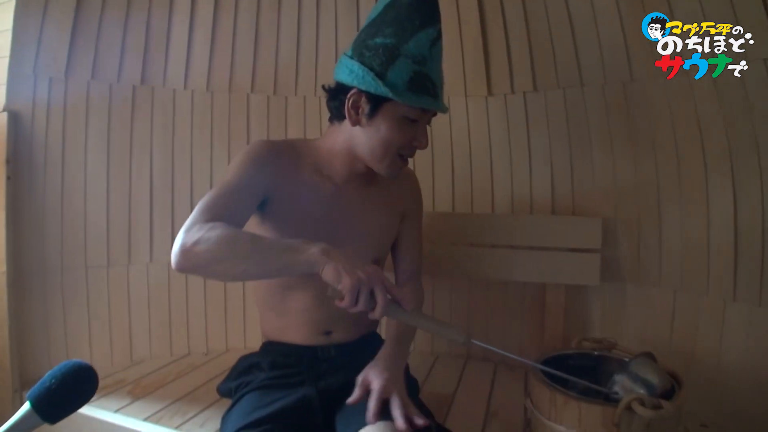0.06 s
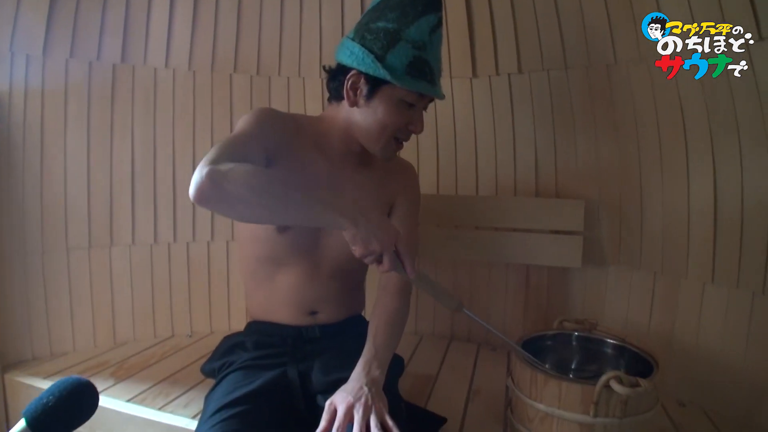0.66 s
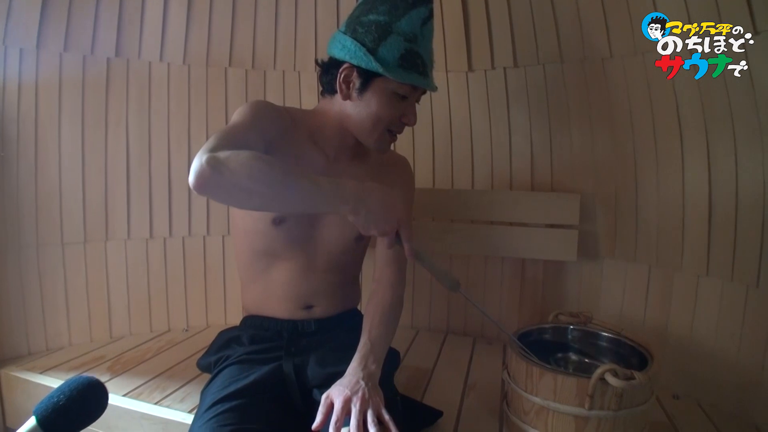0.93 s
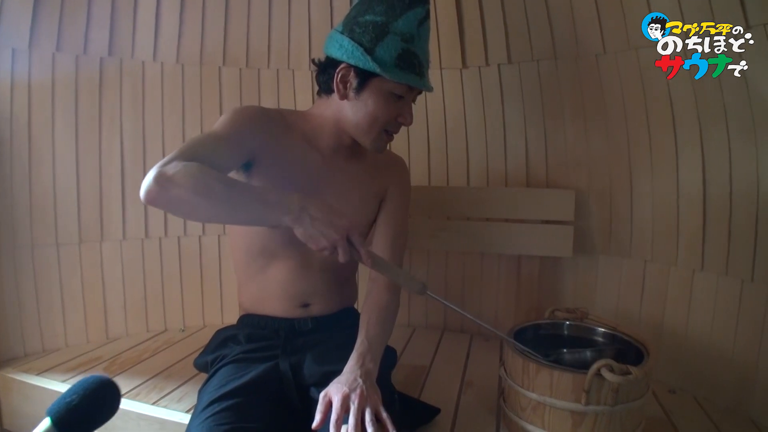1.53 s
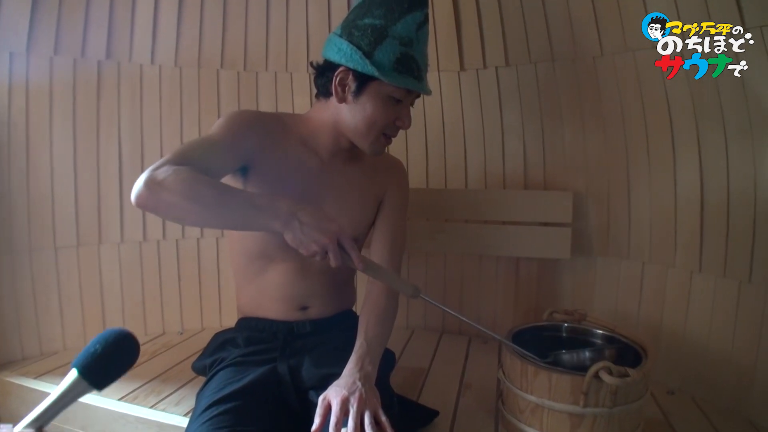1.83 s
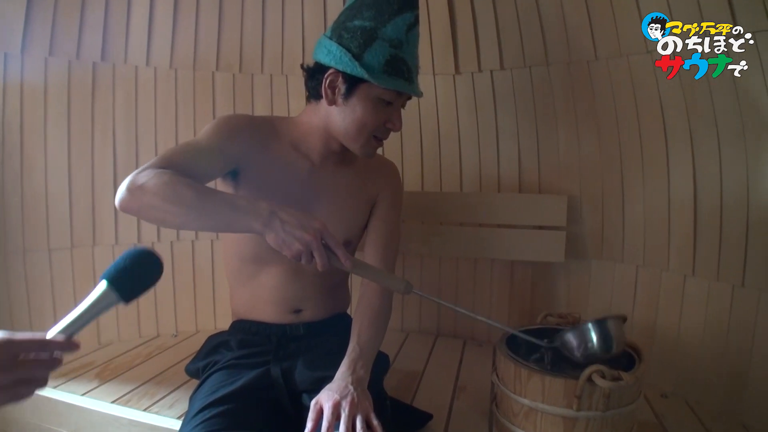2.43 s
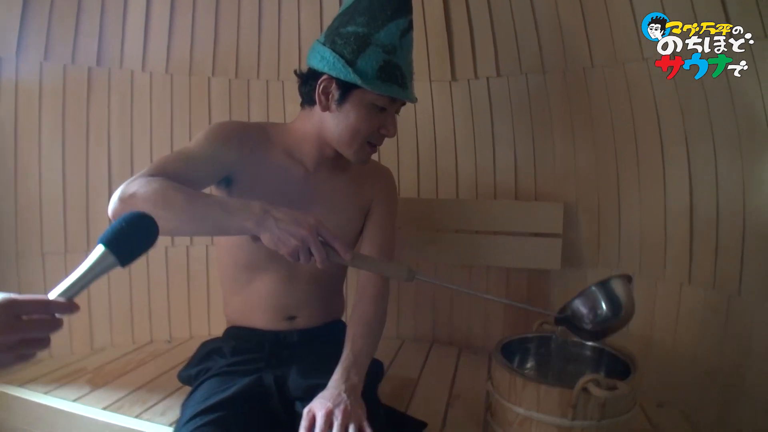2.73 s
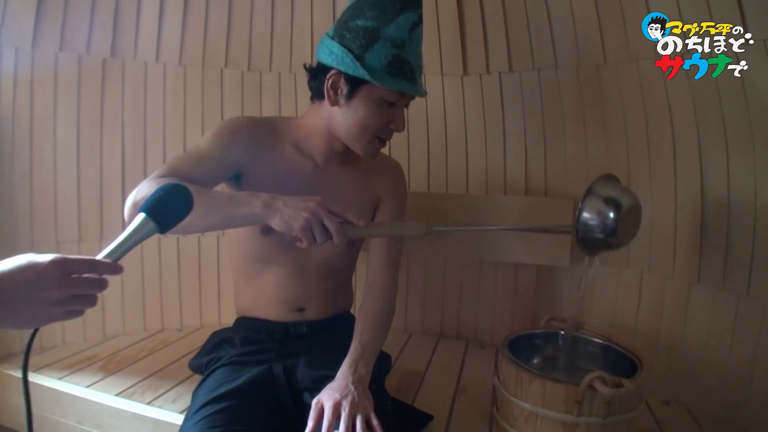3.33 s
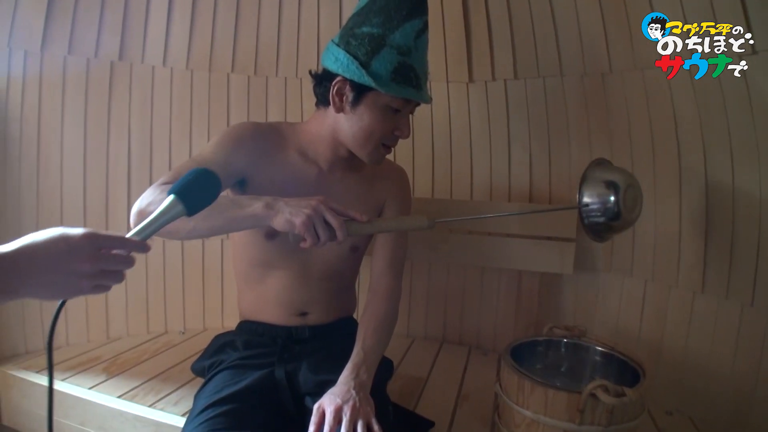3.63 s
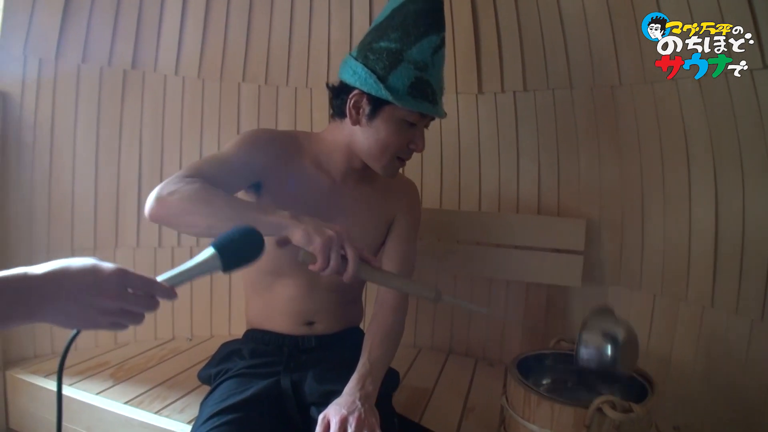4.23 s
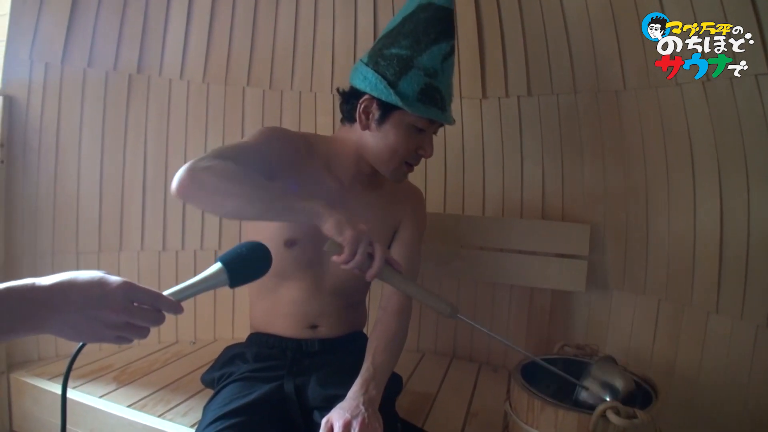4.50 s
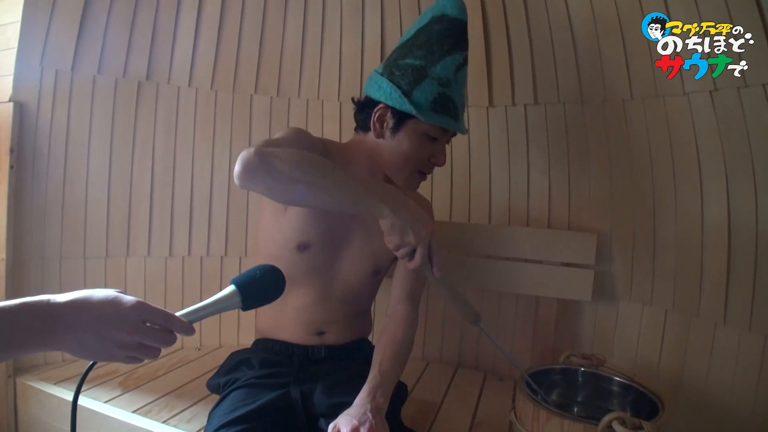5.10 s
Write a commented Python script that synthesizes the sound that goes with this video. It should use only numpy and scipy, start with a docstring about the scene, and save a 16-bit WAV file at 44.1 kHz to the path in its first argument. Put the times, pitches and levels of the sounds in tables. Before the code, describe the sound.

In a small wooden room, a metal ladle strikes a bucket, slides down its lining, bubbles full and spills water back in.

```python
"""A small wood-panelled sauna, one microphone near a metal-lined wooden bucket, over faint hiss and hum.
A long-handled steel ladle clanks on the rim, slides and squeals down the lining, gulps air bubbles
as it fills, and bumps the side on its way up. The microphone is raised and the water sounds closer.
Run-off from the lifted bowl patters back into the bucket, swells to a short splash and ends in drips."""
import sys
import numpy as np
from scipy import signal
from scipy.fft import rfft, irfft, next_fast_len
from scipy.io import wavfile
from scipy.ndimage import uniform_filter1d

SR = 44100
rng = np.random.default_rng(int(sys.argv[2]) if len(sys.argv) > 2 else 0)


def generate_wav(signal):
    """Clip the signal to [-1, 1] and save it as 16-bit WAV at the path in sys.argv[1]."""
    frames = np.transpose(np.atleast_2d(signal))
    scaled = np.clip(frames, -1, 1) * 32767
    pcm = np.round(scaled).astype(np.int16)
    wavfile.write(sys.argv[1], SR, pcm)


N = 227571
TIME = np.arange(N) / SR
TAIL = TIME[:SR * 3 // 4]  # time axis of one decaying sound

# water running off the bowl as it tips, then draining away: time_s, flow_db
RUN_OFF = [(2.62, -81), (2.72, -69), (2.86, -69), (2.96, -62), (3.2, -60), (3.38, -57.5), (3.48, -50.5),
           (3.87, -52), (3.94, -70), (4.45, -79)]


def amp(db):
    """Decibels to gain."""
    return 10 ** (np.asarray(db) / 20)


def unit(x):
    """Scales to rms 1."""
    return x / np.sqrt(np.mean(x ** 2) + 1e-30)


def crest(x):
    """Scales so that the loudest 10 ms have rms 1."""
    return x / np.sqrt(uniform_filter1d(x ** 2, SR // 100).max() + 1e-30)


def read(points, hz):
    """A table joined by straight lines over log frequency."""
    f, value = np.transpose(points)
    return np.interp(np.log(hz + 1), np.log(f + 1), value)


def curve(points):
    """A table joined by straight lines over time, at every sample."""
    return np.interp(TIME, *np.transpose(points))


def add(mix, start_s, sound):
    """Mixes a sound in at a time."""
    part = mix[max(round(start_s * SR), 0):][:len(sound)]
    part += sound[:len(part)]


def colour(x, gain):
    """Filters by a gain given as a function of Hz."""
    size = next_fast_len(len(x))
    return irfft(rfft(x, size) * gain(np.fft.rfftfreq(size, 1 / SR)), size)[:len(x)]


def equalise(x, spectrum):
    """Filters by a table of freq_hz, gain_db."""
    return colour(x, lambda hz: amp(read(spectrum, hz)))


def die_away(x, t60s):
    """Lets each band fade at its own rate."""
    hz, t, bands = signal.stft(x, SR, nperseg=256)
    fade = amp(-60 * t / read(t60s, hz)[:, None])
    return signal.istft(bands * fade, SR, nperseg=256)[1][:len(x)]


def wander(rate_hz):
    """A random drift of rms 1."""
    knots = rng.standard_normal(int(N / SR * rate_hz) + 2)
    return unit(np.interp(TIME * rate_hz, np.arange(len(knots)), knots))


def swell(peak_s, db, sigma_s):
    """A bell-shaped rise and fall around one moment."""
    return amp(db) * np.exp(-.5 * ((TIME - peak_s) / sigma_s) ** 2)


def chance(per_s, length=N):
    """Marks random samples at a mean rate."""
    return rng.random(length) < per_s / SR


def drop_sizes(spread_db):
    """A random gain for every sample: mostly small, a few large."""
    return amp(spread_db * np.minimum(rng.exponential(1, N), 3))


def singing(hz, width_hz):
    """A resonance kept ringing by irregular pushes: fairly even in level, restless in phase."""
    x = colour(rng.standard_normal(N), lambda f: 1 / (1 + (2 * (f - hz) / width_hz) ** 2))
    return x / np.sqrt(uniform_filter1d(x ** 2, size=2200) + 1e-20)


def cabin(x, wet_db, first_echo_s=.003):
    """Direct sound plus dense echoes off the close wooden walls, drawn afresh for each sound."""
    # decay of the room: freq_hz, t60_s
    room_decay = [(200, 0.37), (1000, 0.13), (3000, 0.17), (8000, 0.1), (15000, 0.18)]
    taps = rng.standard_normal(len(TAIL)) * chance(4000, len(TAIL)) * (TAIL > first_echo_s)
    echoes = die_away(taps, room_decay)
    response = amp(wet_db) * echoes / np.linalg.norm(echoes)
    response[0] += 1
    return signal.fftconvolve(x, response)[:len(x)]


def room_tone(hiss_db=-66.5, settled_db=-71, fall_db=7.5, settle_s=1.84):
    """Steady faint hiss, and a wavering hum where the cabin resonates that starts louder and settles."""
    # colour of the hiss: freq_hz, gain_db
    hiss_spectrum = [(15, -43.5), (25, -16.5), (98, -10.5), (167, -11), (219, -8.5), (271, -20), (301, -8),
                     (529, -12.5), (621, -11.5), (1420, -17.5), (1720, -20.5), (2300, -25.5), (3010, -27),
                     (3730, -25), (15000, -28.5)]
    hiss = unit(equalise(rng.standard_normal(N), hiss_spectrum))
    hum_db = settled_db + fall_db * np.exp(-TIME / settle_s) + 2.5 * wander(7.3)
    return amp(hiss_db) * hiss + amp(hum_db) * singing(hz=228, width_hz=65)


def ring(modes, t60_scale=1.0, gain=np.ones_like):
    """Decaying partials, each as strong as the blow is at its frequency."""
    hz, db, t60 = np.transpose(modes)[:, :, None]
    phase = rng.random(hz.shape)
    decay = np.exp(-np.log(1000) * TAIL / (t60 * t60_scale))
    return (gain(hz) * amp(db) * decay * np.sin(2 * np.pi * (hz * TAIL + phase))).sum(0)


def knocks(build_s=0.01, clatter_db=-5.5, clatter_t60_scale=0.9):
    """Each blow rings steel and staves, building while the bowl chatters and the first echoes arrive."""
    # ladle against bucket: start_s, level_db, corner_hz (low = soft blow), steel_db, wood_db
    blows = [(0.066, -56.5, 6960, -1, -3), (0.446, -20, 13800, 2.5, -27), (0.4551, -25, 6200, -10, -25),
             (0.6661, -44, 1670, -12, -8), (0.854, -59, 6000, -11, -8), (1.006, -45, 3700, -0.5, -26),
             (1.915, -54, 2400, 1, -13), (2.273, -48.5, 945, -10, 11.5), (2.679, -61, 2480, -13, -3.5),
             (4.033, -57.5, 3040, -10, -13), (4.607, -66, 3520, -8, -15.5), (4.983, -65.5, 2970, 0, -2.5)]
    # steel bowl and lining: pitch_hz, level_db, base_t60_s
    steel_modes = [(828, -19, .22), (877, -20, .22), (922, -29, .5), (1345, -13, .19), (1540, -18, .28),
                   (1728, -15, .15), (2216, -12, .16), (2462, -33, .4), (2493, -18, .2), (2619, -13, .16),
                   (2697, -13, .15), (2923, -15, .13), (3036, -13, .17), (3122, -29, .6), (3223, -2, .11),
                   (3326, -12, .12), (3464, -12, .15), (3509, -8, .13), (3543, -8, .14), (3710, -12, .15),
                   (3936, -13, .13), (3986, -13, .13), (4472, -8, .12), (4625, -6, .12), (4846, -9, .12),
                   (5068, -29, .36), (5547, -14, .11), (5660, -12, .1), (5994, -18, .14), (7609, -23, .1)]
    # staves and water-loaded bottom: pitch_hz, level_db, base_t60_s
    stave_modes = [(196.4, -17, 0.36), (242.6, -16.5, 0.16), (320.8, -3.5, 0.32), (400, -9.5, 0.18),
                   (640.5, -5.5, 0.21), (1075, -7, 0.36), (1177, -1, 0.13), (1448, -9.5, 0.17),
                   (1617, -14.5, 0.38)]
    # the dense weaker modes: freq_hz, gain_db
    clatter_spectrum = [(35, -68.5), (100, -37.5), (220, -16.5), (310, -25.5), (430, -16), (650, -24),
                        (850, -15), (1400, -14.5), (2200, -8), (3250, -8), (4500, -8), (6500, -10.5),
                        (9500, -14.5), (16000, -35.5)]
    # their decay: freq_hz, base_t60_s
    clatter_decay = [(150, 0.78), (400, 0.29), (1000, 0.37), (2800, 0.2), (5000, 0.15), (8000, 0.11),
                     (14000, 0.113)]
    out = np.zeros(N)
    build = np.minimum(0.3 + TAIL / build_s, 1) * np.minimum(TAIL / .0005, 1)
    for start_s, db, corner_hz, steel_db, wood_db in blows:
        contact = lambda hz: 1 / np.sqrt(1 + (hz / corner_hz) ** 4)  # a soft blow leaves out the treble
        noise = rng.standard_normal(len(TAIL))
        dense = unit(colour(noise, lambda hz: amp(read(clatter_spectrum, hz)) * contact(hz)))
        clatter = die_away(dense, [(hz, t60 * clatter_t60_scale) for hz, t60 in clatter_decay])
        steel = amp(steel_db + 0.5) * ring(steel_modes, t60_scale=1.27, gain=contact)
        wood = amp(wood_db) * ring(stave_modes, t60_scale=0.8)
        add(out, start_s, amp(db) * build * (2 * amp(clatter_db) * clatter + steel + wood))
    return out


def wetness(time_s, deep_db=2.5, raised_db=-1):
    """Sounds deep in the bucket arrive mostly as echo; more comes direct once the microphone is raised."""
    return np.interp(time_s, [2.3, 3.1], [deep_db, raised_db])


def bubble(hz, t60, rise_octaves=0.18):
    """A pocket of air rings and climbs in pitch, by rise_octaves per t60, as it nears the surface."""
    t = TAIL[:SR // 3]
    pitch = hz * 2 ** (rise_octaves * np.minimum(t / t60, 2))
    envelope = np.exp(-np.log(1000) * t / t60) * (1 - np.exp(-t * hz))
    return np.sin(2 * np.pi * np.cumsum(pitch) / SR) * envelope


def plinks(satellites=4, satellite_db=-9, scatter_octaves=0.365, max_delay_s=.014):
    """Large bubbles ring, each tearing off a few satellites; small ones ring higher and die sooner."""
    # the loudest single bubbles: start_s, pitch_hz, level_db
    bubbles = [(0.066, 3200, -58), (0.667, 408, -50.5), (0.957, 1057, -55.5), (0.984, 500, -53),
               (1.009, 577, -53), (1.038, 1180, -48.5), (1.467, 2310, -50.5), (1.469, 4000, -46.5),
               (1.492, 2460, -50.5), (1.631, 2430, -52.5), (1.635, 2900, -53), (1.665, 2750, -52.5),
               (1.757, 1740, -57), (1.759, 2360, -56), (2.221, 3410, -58), (2.36, 2840, -64.5),
               (2.417, 3090, -51.5), (3.115, 730, -59), (3.133, 2690, -56.5), (3.268, 5060, -47),
               (3.268, 1157, -56), (3.418, 390.6, -44), (3.471, 3230, -48), (3.607, 3180, -49),
               (3.637, 2720, -39.5), (3.661, 3340, -48), (3.76, 2900, -47.5), (3.775, 2780, -40.5),
               (3.806, 592, -48.5), (3.81, 3530, -37), (3.833, 2684, -37.5), (3.837, 1930, -44),
               (3.849, 562, -49.5), (3.912, 759, -52.5), (3.969, 6500, -56.5), (4.364, 5360, -57),
               (4.916, 2900, -59.5)]
    out = np.zeros(N)
    t60 = lambda hz: 50 * (1000 / hz) ** 0.31 / hz  # 50 cycles at 1 kHz, fewer above
    for start_s, hz, db in bubbles:
        cluster = bubble(hz, t60(hz))
        for height, delay in rng.random((satellites, 2)):
            satellite_hz = hz * 2 ** (scatter_octaves * (3 * height - 1))
            satellite = bubble(satellite_hz, t60(satellite_hz) / 2)
            add(cluster, max_delay_s * delay, amp(satellite_db) * satellite)
        add(out, start_s, amp(db) * crest(cabin(cluster, wetness(start_s))))
    return out


def slaps():
    """A drop hits the surface with a sharp tick and a very short burst of hiss."""
    # the loudest drops: start_s, level_db, centre_hz
    drops = [(0.065, -60, 9300), (0.667, -54, 7100), (1.01, -61, 9900), (1.468, -49, 5340),
             (1.494, -52.5, 3500), (1.634, -54, 3230), (1.672, -60.5, 5430), (2.904, -63.5, 6040),
             (2.948, -61, 8300), (3.059, -58, 6100), (3.137, -54.5, 4740), (3.505, -51, 7600),
             (3.577, -52, 9200), (3.7254, -44.5, 5400), (3.775, -48, 6350), (3.809, -54, 9000),
             (3.848, -35, 8600), (3.895, -51, 7600), (4.191, -64, 11000), (4.299, -54.5, 9900),
             (4.362, -68, 9700), (4.513, -64.5, 9000)]
    out, t = np.zeros(N), TAIL[:SR // 3]
    burst = np.exp(-t / .0018) + .2 * np.exp(-t / .008)
    for start_s, db, centre_hz in drops:
        octaves = max(0.56 + 0.0074 * (db + 55), .1)  # harder slaps cover a broader band
        noise = rng.standard_normal(len(t))
        hiss = colour(noise, lambda hz: 1 / (1 + (np.log2((hz + 1) / centre_hz) / octaves) ** 2))
        add(out, start_s, amp(db) * crest(cabin(hiss * burst, wetness(start_s) - 1)))
    return out


def pressure(light_db=-5.5, firm_db=3.5):
    """Level of the sliding and weight of its low modes, both in dB: a light touch plus the pushes."""
    # faint handling rustle, then the bowl sliding lightly down the lining after the clank: time_s, level_db
    light_touch = [(0.2, -72.5), (0.44, -71), (0.56, -59.5), (0.8, -60), (1.1, -60.5), (1.2, -57.5),
                   (1.5, -60), (1.74, -65), (1.98, -59.5), (2.15, -77)]
    # the hand presses harder for a moment: peak_s, level_db, sigma_s
    pushes = [(0.69, -55, 0.048), (0.881, -61.5, 0.026), (0.973, -57.5, 0.026), (1.04, -55, 0.019),
              (1.318, -53, 0.038), (1.925, -62, 0.02)]
    touch = amp(curve(light_touch)) ** 2
    push = sum(swell(*row) ** 2 for row in pushes)
    return 10 * np.log10(touch + push), light_db + (firm_db - light_db) * push / (touch + push)


def slide(knee_hz=2400, grit_db=1.5, ring_growth=.65):
    """Tiny slips of steel on steel keep the lining singing; pressure brings out its low modes."""
    # resonances that the sliding wakes: pitch_hz, width_hz, level_db
    rubbed_modes = [(469, 4.9, 4), (1000, 14, -5.5), (1182, 33, 3.5), (1704, 85, -2), (1976, 25.8, -8.5),
                    (2287, 26, -13), (3090, 36, 0), (3340, 75, -2.5), (3444, 55, -15.5), (4585, 99, -8),
                    (4940, 50, -16), (4930, 80, -12), (5277, 130, -13.5), (5400, 60, -15),
                    (6830, 200, -14.5), (7140, 160, -22)]
    # dry hiss of the scrape: freq_hz, gain_db
    grit_spectrum = [(100, -31), (300, -30), (1000, -7.5), (2800, -10), (3900, -16), (5000, -21.5),
                     (7500, -22.5), (9000, -44), (16000, -41)]
    level_db, low_db = pressure()
    slips = rng.standard_normal(N) * chance(per_s=700) * amp(2.5 * wander(45))
    grit = amp(grit_db) * equalise(slips, grit_spectrum)
    modes = np.zeros(N)
    for hz, width_hz, db in rubbed_modes:
        reach_db = 3 * wander(12)  # the moving contact finds and loses each mode
        modes += amp(db + reach_db) * colour(slips, lambda f: 1 / (1 + 2j * (f - hz) / width_hz))
    firmness = amp(ring_growth * (level_db - level_db.max()))  # a light touch hisses, a firm one rings
    scrape = unit(cabin(grit + firmness * modes, wet_db=5.0))
    scrape /= np.sqrt(uniform_filter1d(scrape ** 2, size=6600) + 1e-12)  # evens the level over 150 ms
    low = colour(scrape, lambda hz: 1 / (1 + (hz / knee_hz) ** 8))
    return amp(level_db) * (scrape - low + amp(low_db) * low)


def squeals():
    """For a moment the friction locks on to one mode of the lining."""
    # brief notes as the steel sticks and slips: peak_s, pitch_hz, level_db
    notes = [(0.6, 2484, -57.5), (0.636, 3100, -59.5), (0.73, 405, -63), (1.285, 1774, -67),
             (1.31, 3126, -66), (1.325, 472, -57.5), (1.335, 2084, -60), (1.93, 1138, -63.5),
             (1.945, 2990, -58)]
    return sum(swell(peak_s, db, sigma_s=.03) * singing(hz, width_hz=24) for peak_s, hz, db in notes)


def thumps(attack_s=0.022):
    """A push on the bucket reaches the bench, which booms softly."""
    # the bucket rocking on the bench: start_s, level_db
    rocks = [(0.667, -57.5), (0.991, -58), (2.274, -54.5), (2.4, -55.5)]
    # modes of the bench: pitch_hz, level_db, t60_s
    bench_modes = [(87.7, -5.5, 0.44), (120, -10, 0.6), (198, 8, 0.37), (241.5, 4, 0.56), (312, 8, 0.16)]
    out = np.zeros(N)
    for start_s, db in rocks:
        add(out, start_s, amp(db) * crest(ring(bench_modes) * (1 - np.exp(-TAIL / attack_s))))
    return out


def swarm(low_hz, high_hz, per_s, cycles, spread_db, pitches=36):
    """Many small bubbles of random size at random moments."""
    out = np.zeros(N)
    for hz in np.geomspace(low_hz, high_hz, pitches):
        grain = bubble(hz * rng.uniform(1.0, 1.04), cycles / hz, rise_octaves=0.49)[:SR // 8]
        births = chance(per_s / pitches) * drop_sizes(spread_db)
        out += signal.oaconvolve(births, grain * np.sqrt(hz) / np.linalg.norm(grain))[:N]
    return unit(out)


def pour(spurt_db=2.2, spurt_hz=21.91, gurgle_db=-7):
    """Run-off lands in uneven spurts, fizzes on the surface and drives deeper, slower bubbles under it."""
    # spray at the surface: freq_hz, gain_db
    spray_spectrum = [(530, -41), (900, -24), (1700, -0.5), (2200, -2), (3200, 1), (4200, -1), (5500, -8.5),
                      (8000, -12.5), (12000, -24), (16000, -30.5)]
    # bubbling below it: freq_hz, gain_db
    gurgle_spectrum = [(200, -30), (310, 7.5), (380, -12), (480, -15), (620, -8), (800, -4.5), (1200, -8.5),
                       (1800, -15), (3000, -32.5)]
    # deep bubbling where a gush or the bowl itself goes under: peak_s, level_db, sigma_s
    gulps = [(3.28, -64.5, 0.027), (3.46, -53, 0.05), (3.85, -59, 0.078), (4.97, -69, 0.19)]
    flow = amp(curve(RUN_OFF) + spurt_db * wander(spurt_hz))
    depth = np.hypot(amp(gurgle_db) * flow, sum(swell(*row) for row in gulps))
    ticks = unit(drop_sizes(spread_db=3) * rng.choice([-1, 1], N) * chance(per_s=600))
    plops = swarm(2200, 9000, per_s=160, cycles=12, spread_db=2.5)
    fizz = swarm(1300, 14000, per_s=1100, cycles=22, spread_db=3.5)
    clumps = amp(3 * wander(55))  # fine spray comes in clumps
    spray = unit(equalise(clumps * (fizz + amp(-9) * ticks + amp(-5) * plops), spray_spectrum))
    deep_bubbles = swarm(330, 1900, per_s=420, cycles=28, spread_db=3.5)
    gurgle = unit(equalise(deep_bubbles, gurgle_spectrum))
    return flow * unit(cabin(spray, wet_db=7.5)) + depth * unit(cabin(gurgle, wet_db=7.5))


def spatter(full_flow_db=-63.5, centre_hz=7000, decay_s=.001):
    """Stray droplets leave the bowl from the moment it tips, and tick on after the stream has thinned."""
    flow_db, tip_s = curve(RUN_OFF), RUN_OFF[0][0]
    droplets = drop_sizes(spread_db=2.5) * chance(per_s=74)
    bursts = signal.lfilter([1], [1, -np.exp(-1 / (decay_s * SR))], droplets) * rng.standard_normal(N)
    ticks = colour(bursts, lambda hz: 1 / (1 + np.log2((hz + 1) / centre_hz) ** 2))
    level = amp(full_flow_db + 0.52 * (flow_db - flow_db.max())) * (TIME > tip_s)
    return level * unit(cabin(ticks, wet_db=0.5))


def hollow(start_s=3.425, end_s=3.91, attack_s=0.012, release_s=0.013, level_db=-60):
    """The falling water sounds the air inside the bucket while the stream is unbroken."""
    attack = np.clip((TIME - start_s) / attack_s, 0, 1)
    release = np.exp(-np.maximum(TIME - end_s, 0) / release_s)
    return amp(level_db + 2.5 * wander(13)) * attack * release * singing(hz=384, width_hz=22)


def scene():
    """Ladle, water and cabin at one microphone."""
    ladle = knocks() + thumps() + slide() + squeals()
    water = plinks() + slaps() + pour() + hollow() + spatter()
    return (ladle + water + room_tone())[None]


def record(dry):
    """The recorder's band limit."""
    lowpass = signal.firwin(255, cutoff=15900, window=("kaiser", 7), fs=SR)
    return signal.oaconvolve(dry, lowpass[None], "same")


dry = scene()
out = record(dry)
generate_wav(out)
```